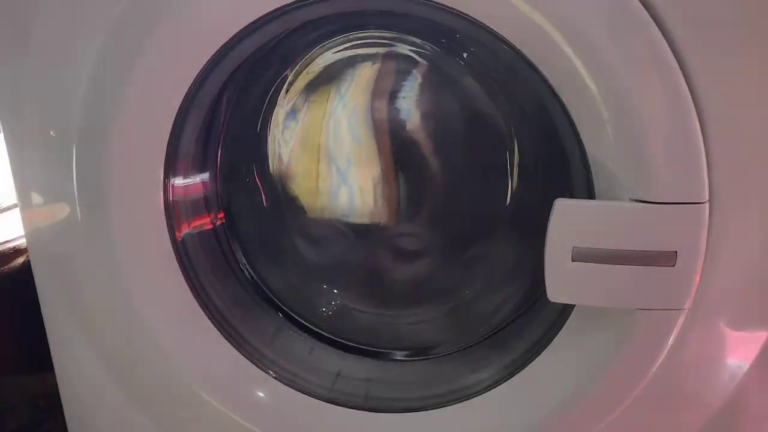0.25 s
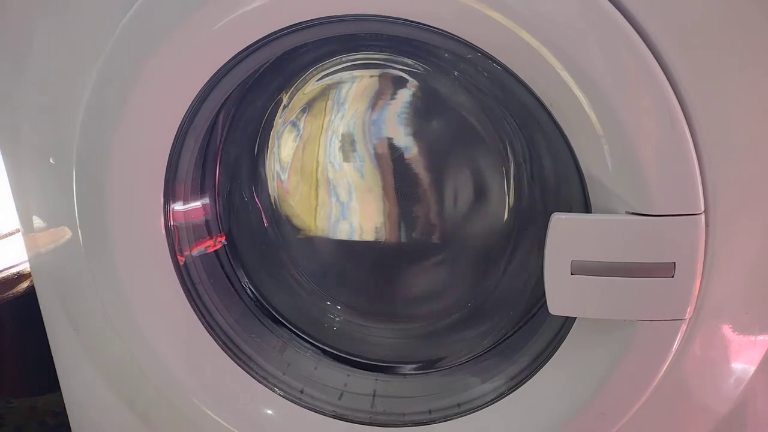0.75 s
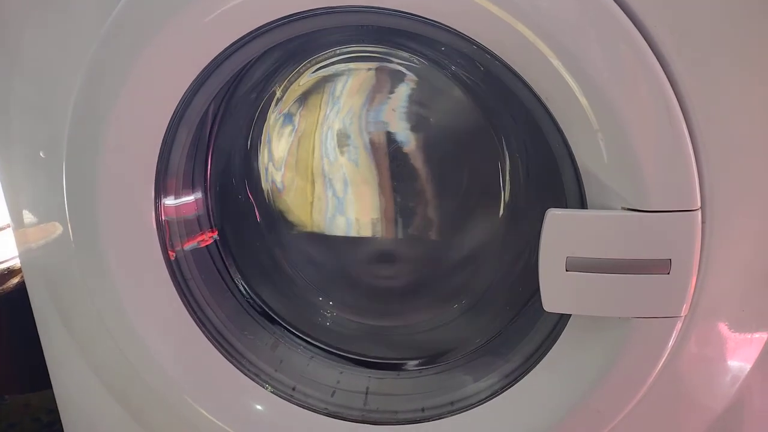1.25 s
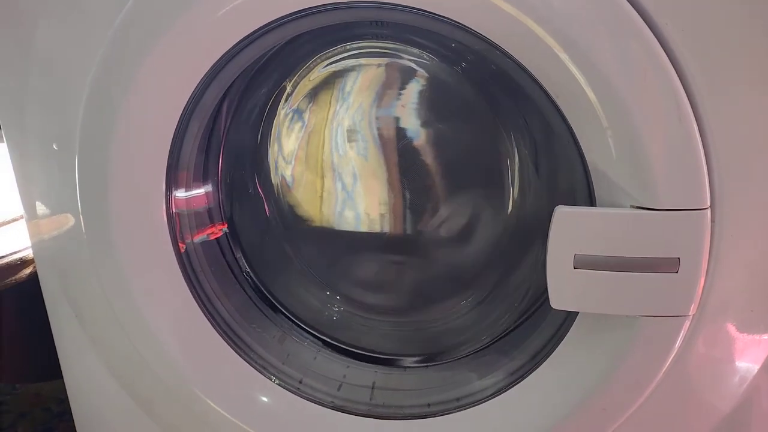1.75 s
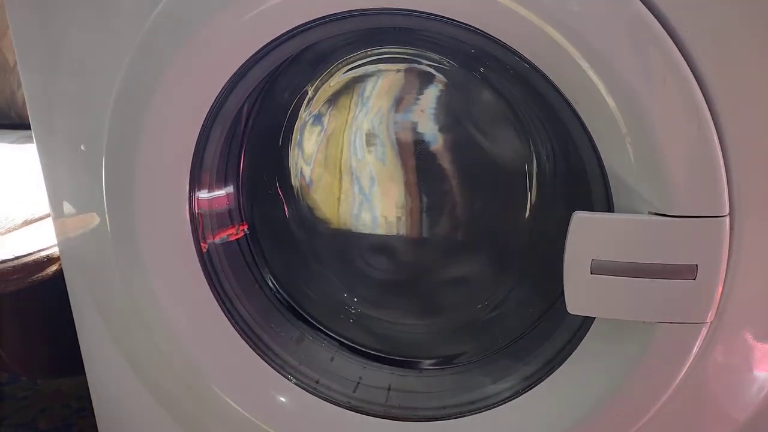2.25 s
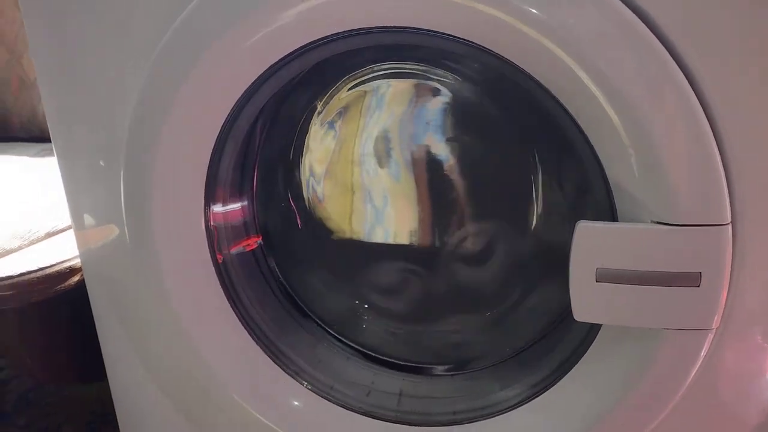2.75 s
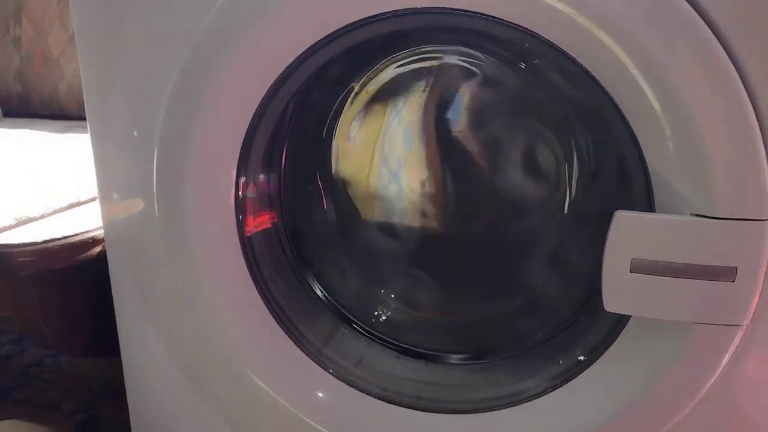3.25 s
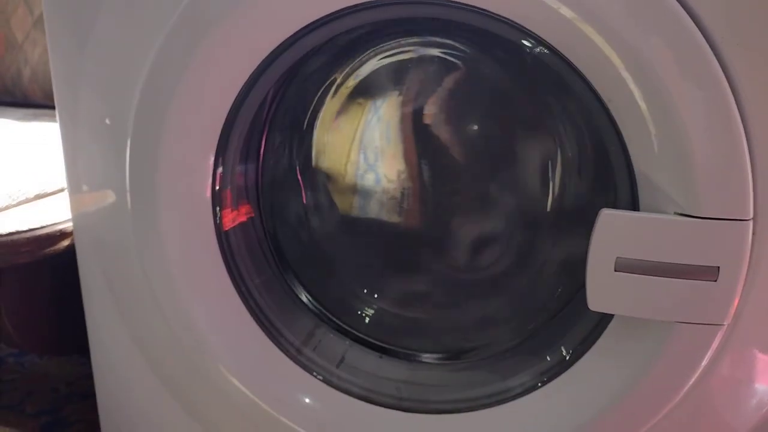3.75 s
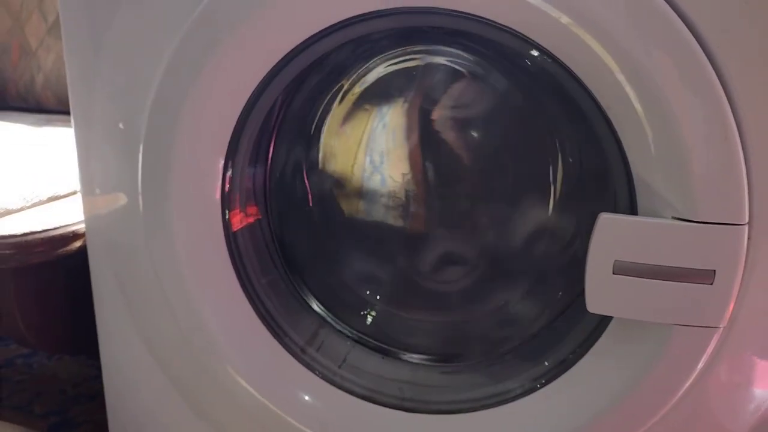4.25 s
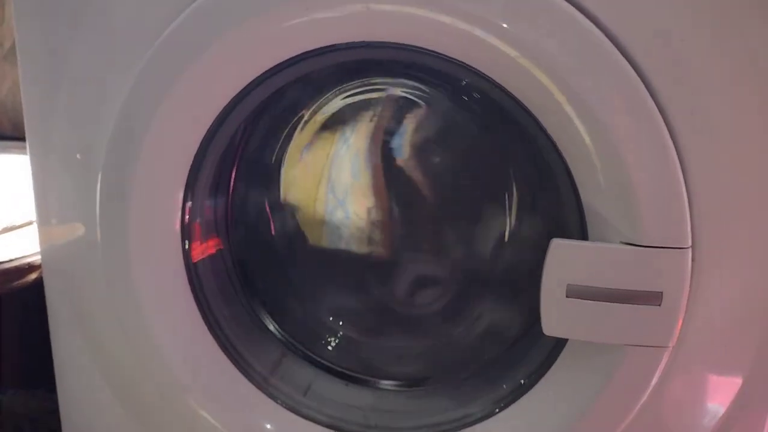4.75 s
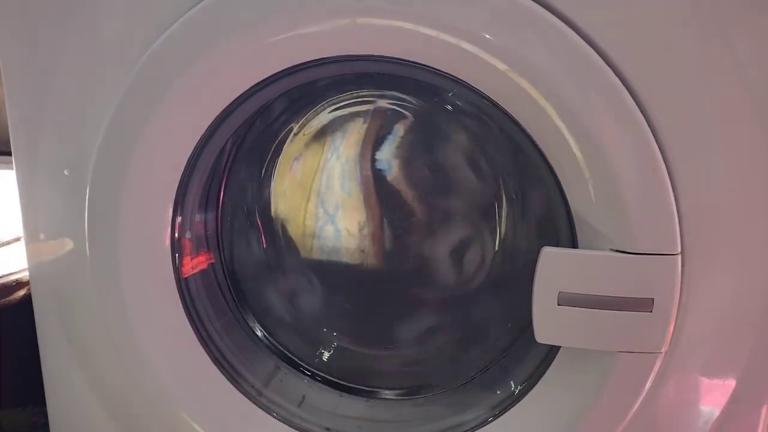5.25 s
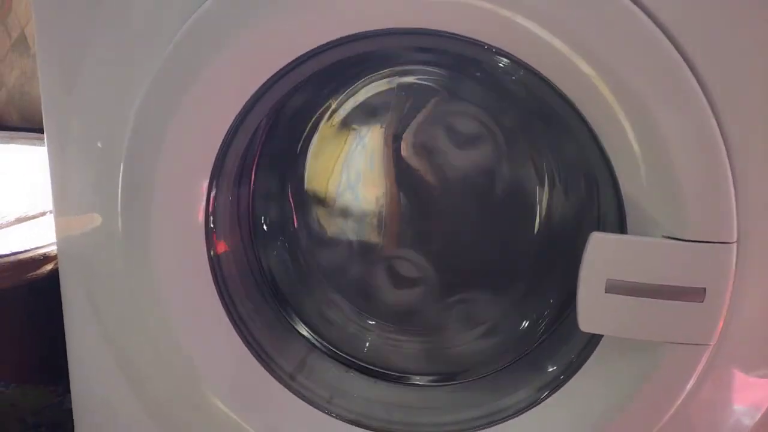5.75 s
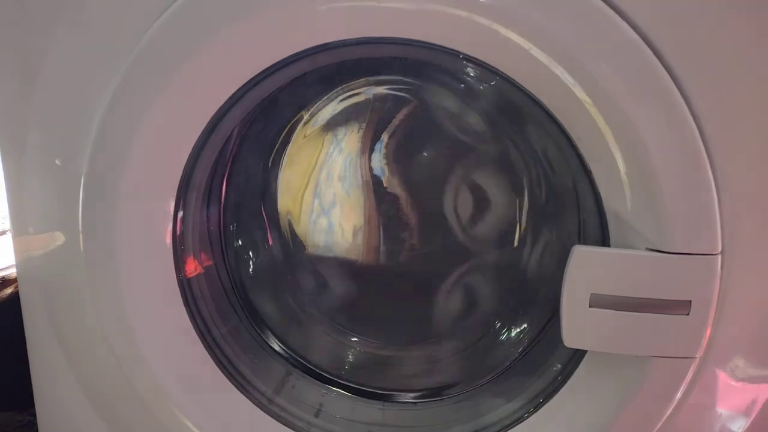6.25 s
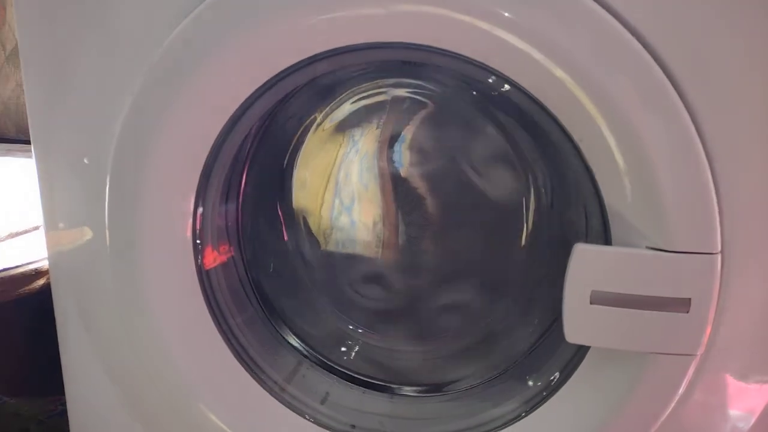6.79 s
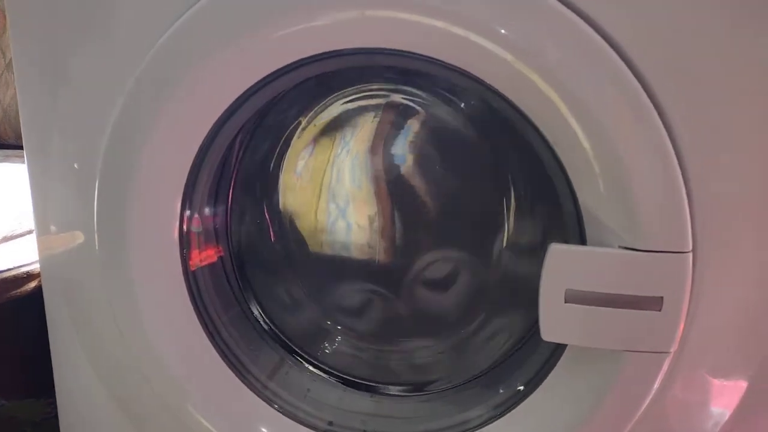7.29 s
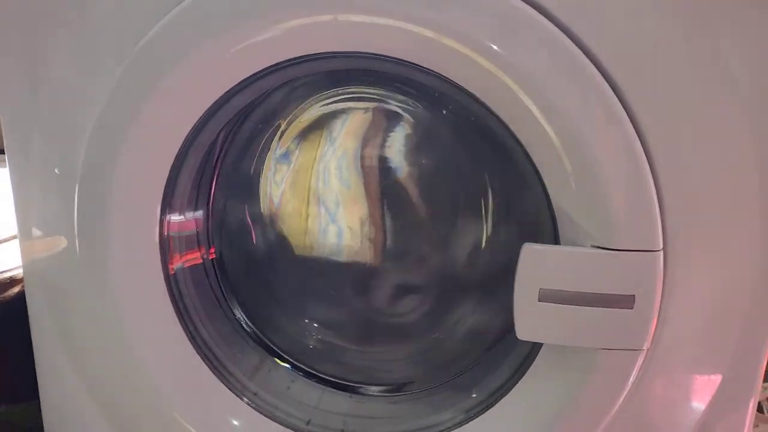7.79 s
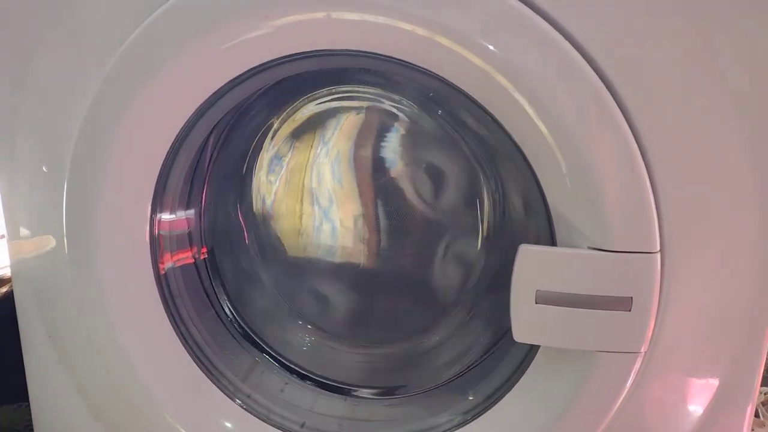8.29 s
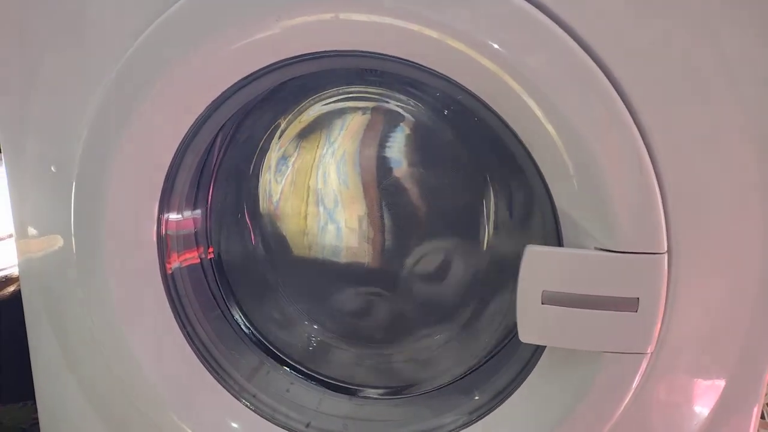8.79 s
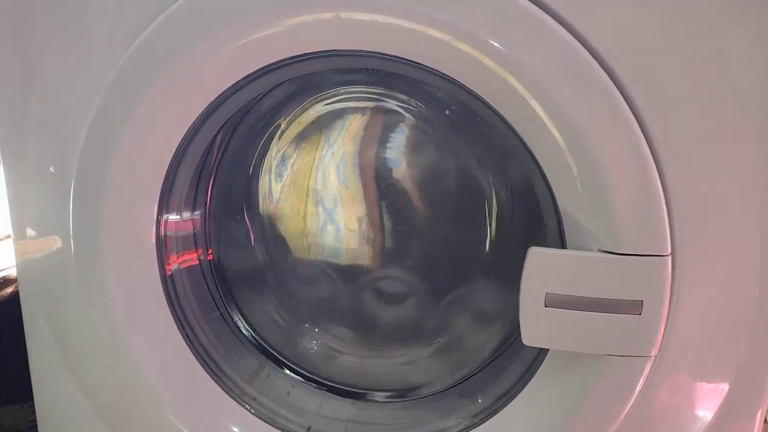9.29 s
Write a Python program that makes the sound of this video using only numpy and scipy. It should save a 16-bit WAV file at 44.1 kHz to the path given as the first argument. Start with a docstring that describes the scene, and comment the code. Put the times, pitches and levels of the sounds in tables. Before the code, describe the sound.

A front-loading washing machine is heard close up in a small, nearly dry indoor space. At 0 seconds a soft hollow churning of wet laundry pulses about six times a second; it swells to its fullest around 1.4 seconds. Mostly low-mid, boxy and watery, it dips briefly each turn, most sharply near 2.3 and 3.1 seconds. Soft wet slaps cluster between 1.8 and 3.6 seconds, with later ones near 5.6, 7.7 and 8.7. Fine spray hisses at 2.5-2.8, then over 4.7-7.2, brightest near 5.7. Short dry ticks on the door stand out at 4.7 and 7.9, with lesser ones near 7.6 and 8.5. Tiny high squeaks come at 2.4 and 4.9. The turning slows evenly to about two turns a second, and churning fades from around 6.5 without stopping by 9.5, leaving smooth hiss more exposed.

```python
"""One hears wet laundry churning round close by, a short lull once a turn, under hiss, ticks and squeaks.
A front-loading washing machine slows evenly from about six to two turns a second.
Noise and impacts of laundry and water excite the tub's hollow modes; slaps add brief bursts.
Filtered splashes make spray on the door glass, damped sines its ticks, and wavering sines wet squeaks.
"""
import sys
import numpy as np
from scipy import signal
from scipy.fft import rfft, irfft
from scipy.io import wavfile
from scipy.ndimage import uniform_filter1d

SR = 44100
rng = np.random.default_rng(int(sys.argv[2]) if len(sys.argv) > 2 else 0)


def wav_out(sig):
    """Save sig, one row per channel (or a flat mono array), as 16-bit PCM at SR to the path in sys.argv[1]."""
    wavfile.write(sys.argv[1], SR, np.round(np.clip(np.atleast_2d(sig).T, -1, 1) * 32767).astype(np.int16))


N = 420273
TIME = np.arange(N) / SR
FREQS = np.fft.rfftfreq(N, 1 / SR)

START_TURNS_PER_S, SLOWING_PER_S2 = 5.829, 0.4108
SPEED = START_TURNS_PER_S - SLOWING_PER_S2 * TIME  # turns a second


def gain_of(db):
    """Decibel law: 20 dB is a factor of ten in amplitude."""
    return 10 ** (np.asarray(db) / 20)


def evened(x):
    """Normalisation: scales a signal to rms 1."""
    return x / np.sqrt(np.mean(x ** 2) + 1e-20)


def colour(points):
    """Spectral envelope: (Hz, dB) points joined over log frequency, as an amplitude gain."""
    hz, db = np.transpose(points)
    return gain_of(np.interp(np.log(FREQS + 1), np.log(hz + 1), db))


def filtered(x, gain):
    """Linear filtering: multiplies the spectrum by a gain per frequency."""
    return irfft(rfft(x) * gain, N)


def curve(rows, column=1):
    """Linear interpolation: one column of a table joined by straight lines in time."""
    rows = np.asarray(rows)
    return np.interp(TIME, rows[:, 0], rows[:, column])


def flutter(rate_hz):
    """Low-pass noise: a slow random swing of rms 1, up to about the given rate."""
    return evened(filtered(rng.standard_normal(N), np.exp(-(FREQS / rate_hz) ** 2)))


def splashes(per_s, spread_db, share):
    """Shot noise: separate impacts of unequal size, mixed by power share with steady flow noise."""
    size = gain_of(spread_db * np.minimum(rng.exponential(1, N), 4))
    sign = rng.choice([-1., 1.], N)
    struck = rng.random(N) < per_s / SR
    impacts = evened(size * sign * struck)
    share = np.clip(share, 0, 1)
    return np.sqrt(share) * impacts + np.sqrt(1 - share) * rng.standard_normal(N)


def summed_db(levels):
    """Power addition: joint level of uncorrelated sounds."""
    power = sum(gain_of(db) ** 2 for db in levels)
    return 10 * np.log10(power + 1e-20)


def comb(spacing_hz, depth, onset_hz=2200):
    """Comb filtering: evenly spaced treble notches; a negative depth gives peaks there."""
    ramp = np.clip(2 * FREQS / onset_hz - 1, 0, 1) ** 4  # from none at half the onset to full
    depth = np.clip(depth, -.99, .99)
    return np.sqrt(1 - depth * ramp * np.cos(2 * np.pi * FREQS / spacing_hz))


# Spectrum of the background hiss. Each row: frequency in Hz, relative density in dB per Hz.
HISS_COLOUR = [(25, 4.5), (60, 4.5), (100, 8.5), (1000, 8), (3500, 4), (6000, -4.5), (8500, -3.5),
               (11000, -3.5), (16000, -5.5)]
# Course of the background hiss. Each row: time in seconds, level in dB.
HISS = [(0, -70.5), (.6, -70.5), (1.3, -66), (5, -66), (9.53, -65.5)]


def hiss():
    """Broadband noise: a smooth hiss behind everything, shaped in spectrum and level."""
    return evened(filtered(rng.standard_normal(N), colour(HISS_COLOUR))) * gain_of(curve(HISS))


# How lopsided the load lies. Each row: time in seconds, lull depth in dB before each layer's scaling.
LOPSIDED = [(0, 2), (1.5, 2), (1.9, 4), (2.28, 11.5), (2.72, 2.5), (3.15, 8.5), (4.5, 3), (5.2, 2),
            (9.53, -1)]
FIRST_LULL_S = 0.2
LULL_S, LULL_SHARPENS_S_PER_DB = 0.038, 0.0012  # a deeper lull is shorter


def lulls(stretch, lead_s, depth, extra_db, pickup=1.3):
    """Periodic modulation in dB: once a turn the load leaves the wall, then is picked up faster."""
    turns = np.cumsum(SPEED) / SR
    turns = turns - np.interp(FIRST_LULL_S, TIME, turns)
    deep_db = curve(LOPSIDED)
    length = stretch * np.maximum(LULL_S - LULL_SHARPENS_S_PER_DB * deep_db, .01)
    since_lull_s = (turns - np.round(turns)) / SPEED + lead_s
    u = since_lull_s / length
    dips = (depth * deep_db + extra_db) * np.exp(-np.where(u > 0, pickup * u, u) ** 2)
    # the local mean power over a third of a second is held level
    return -dips - 10 * np.log10(uniform_filter1d(10 ** (-dips / 10), size=SR // 3))


# Drive of the tub's bass, low and middle modes before trims. Each row: time in seconds,
# rumble level in dB, churning level in dB, sloshing level in dB.
LOAD = [(0.0, -48.5, -32.5, -37), (0.7, -40.0, -28, -31.0), (1.35, -33.5, -21.5, -23.5),
        (2.3, -37, -22.0, -27.5), (2.95, -35, -22, -29), (3.8, -35, -22, -31), (4.9, -33.0, -22, -30.5),
        (5.4, -36.5, -24.0, -32.5), (5.9, -37.0, -22.5, -32.5), (6.45, -38.5, -23.5, -34),
        (7.05, -33.5, -25.5, -36.0), (7.7, -36.0, -28, -39), (8.35, -40, -29, -39), (8.85, -36.5, -29, -41),
        (9.53, -38, -31, -42.0)]
# Thin wash of the tub's highest modes. Each row: time in seconds, level in dB.
WASH = [(0, -58), (.6, -58.8), (1.4, -49.7), (3.1, -52.8), (4.3, -57.6), (5.8, -52), (7, -54.7),
        (9.53, -60.6)]
RUMBLE_TRIM_DB, CHURN_TRIM_DB, SLOSH_TRIM_DB = 0.28, 0.01, -0.46
SWISH_DB, SWISH_DB_PER_TURN = -15, 0.8  # against untrimmed sloshing; gain per turn a second lost


def drive_levels():
    """Excitation levels in dB: rumble, churning, sloshing, swish and thin wash."""
    rumble, churning, sloshing = (curve(LOAD, column=k) for k in range(1, 4))
    swish = sloshing + SWISH_DB + SWISH_DB_PER_TURN * (START_TURNS_PER_S - SPEED)
    return [rumble + RUMBLE_TRIM_DB, churning + CHURN_TRIM_DB, sloshing + SLOSH_TRIM_DB,
            swish, curve(WASH)]


# Hollow modes of tub, drum and cabinet. Each row: frequency in Hz, width in Hz between
# the points 9 dB down, relative peak level in dB.
TUB_MODES = [(88.3, 9.5, -17), (104.6, 29, -15.5), (149.7, 30.5, -5), (214.5, 47, -9), (270.1, 56, -4.5),
             (320, 70, -4), (366.1, 77, -0.56), (400, 22, -13.5), (459.4, 22, -1), (449, 52, -7.5),
             (482.8, 45, -4.5), (538.5, 46, -4.5), (567.7, 38, -6.5), (602.3, 26, -4.5), (683.7, 74, -7.5),
             (782.3, 132, -10.5), (885, 130, -21), (1012.4, 96, -17.5), (1083, 71, -21), (1120, 260, -31),
             (1359, 167, -32), (1480, 62, -32), (1614, 200, -38), (1560, 34, -38.5), (1670, 81, -45),
             (1845, 540, -48.0)]


def tub(low, high):
    """Modal superposition: adds the powers of the resonances between two frequencies."""
    power = sum(gain_of(db) ** 2 / (1 + (2 * (FREQS - hz) / width) ** 2) ** 3
                for hz, width, db in TUB_MODES if low <= hz < high)
    return np.sqrt(power)


# Borders between the five groups of modes: a plain list of frequencies in Hz.
GROUP_EDGES_HZ = [0, 185, 520, 930, 1280, 4000]


def drum(levels_db):
    """Forced resonance: laundry and water drive the modes; all but the rumble share splashes."""
    slosh, spatter, slap = flutter(rate_hz=45), flutter(rate_hz=32), slaps()
    water = splashes(per_s=900, spread_db=2.0, share=0.39)
    drives = [rng.standard_normal(N), water, water, water, water]
    sweep = lulls(stretch=0.97, lead_s=0, depth=0.84, extra_db=0.93)
    # the rumble swings more broadly; the higher modes also flutter and slap
    swings = [lulls(stretch=1.2, lead_s=0.0033, depth=0.56, extra_db=0.5),
              0.89 * sweep + 0.85 * slosh + 0.72 * slap - .3,
              0.86 * sweep + 1.9 * slosh + 1.1 * slap - .3,
              1.6 * sweep + 1.9 * spatter + 0.33 * slap - .3,
              1.1 * sweep + 0.89 * spatter + .4 * slap - .3]
    out = np.zeros(N)
    for k, (drive, swing_db) in enumerate(zip(drives, swings)):
        modes = tub(GROUP_EDGES_HZ[k], GROUP_EDGES_HZ[k + 1])
        ring = evened(filtered(drive, modes))
        out += ring * gain_of(levels_db[k] + swing_db)
    return out


# Faint diffuse answer of the room. Each row: frequency in Hz, level in dB against the direct sound.
ROOM = [(60, -31.5), (300, -30), (700, -26.5), (1100, -21.5), (1500, -9.5), (2200, -14.5)]


def room(x, t60=.25):
    """Reverberation: an exponentially decaying noise tail (60 dB in t60), opposite left and right."""
    tail = rng.standard_normal(N) * gain_of(-60 * np.minimum(TIME / t60, 4))
    wet = filtered(x, rfft(tail / np.linalg.norm(tail)) * colour(ROOM))
    return np.array([wet, -wet])


# Gushes of water on the glass. Each row: start in seconds, end in seconds, level in dB,
# extra treble in dB, soft edge in seconds.
GUSHES = [(1.15, 1.7, -74, -1.5, 0.092), (2.53, 2.82, -59.5, -3.5, 0.019), (2.95, 3.55, -70.5, -2, 0.052),
          (4.71, 7.2, -65.2, -2.5, .06), (5.22, 6.08, -63, 3.2, .06), (5.58, 5.76, -64, 7, .02)]
MIST_DB, MIST_TREBLE_DB = -6.5, 1.5  # mist against the background hiss; its treble against its body


def spray_levels():
    """Power addition of a steady mist and gushes that swell, hold and ebb: body and treble in dB."""
    mist = curve(HISS) + MIST_DB
    body, treble = [mist], [mist + MIST_TREBLE_DB]
    for start, end, db, treble_db, edge_s in GUSHES:
        outside = np.maximum(start - TIME, TIME - end) / edge_s
        gush = db - 10 * np.log10(1 + np.exp(np.minimum(outside, 20)))
        body.append(gush)
        treble.append(gush + treble_db)
    return summed_db(body), summed_db(treble)


# Spectrum of the spray before its treble is set. Each row: frequency in Hz, relative density in dB per Hz.
SPRAY_COLOUR = [(900, -16.5), (2000, 2.5), (3300, 0.5), (6000, -4.5), (8500, -11.5), (11000, -20),
                (16000, -26)]


def spray(body_db, treble_db):
    """Shot noise of fine drops on the door glass: body and treble, split near 5 kHz, set apart."""
    drops = evened(filtered(splashes(per_s=470, spread_db=2.0, share=0.16), colour(SPRAY_COLOUR)))
    dull = filtered(drops, 1 / (1 + (FREQS / 5000) ** 8))
    bright = drops - dull
    unsteady = gain_of(1.3 * flutter(rate_hz=15))
    return (dull * gain_of(body_db) + bright * gain_of(treble_db)) * unsteady


def knock(s, hz, ring_s):
    """Damped oscillation: a sine that starts at s and decays by a factor e in ring_s."""
    t = np.clip(TIME - s, 0, 30 * ring_s)
    return -np.sin(2 * np.pi * hz * t) * np.exp(-t / ring_s)


# Ticks on the door glass. Each row: start in seconds, level in dB before the door's response,
# pitch in Hz, ring in seconds, amplitude share that bounces back.
TICKS = [(.3073, -63, 3500, .0005, .6), (.3165, -55, 3200, 0.00043, 0.64), (1.2078, -47, 6000, 0.00022, .3),
         (2.9872, -44, 3600, .0005, 0.18), (3.2157, -46.5, 2830, 0.0011, 0.18),
         (4.714, -13, 1150, 0.00056, 0.34), (4.7400, -28, 1390, 0.00032, 0.94),
         (4.7730, -50, 3400, .0003, .2), (5.0550, -38, 2400, .0004, .3), (5.9027, -36, 6500, 0.00023, 0.27),
         (6.6452, -46, 4000, 0.00027, .5), (6.7600, -45, 5500, .0003, .3),
         (7.564, -30.5, 1500, 0.00052, 0.3), (7.8665, -11.5, 1200, .0003, 0.59),
         (7.8720, -26, 1100, .0004, .1), (8.4674, -27.5, 1480, 0.00043, 0.23),
         (8.9007, -48, 2980, 0.00031, .3)]
# How the struck door radiates. Each row: frequency in Hz, gain in dB.
DOOR = [(40, -38), (250, -10.5), (600, -4), (1100, 2), (1500, -2), (2000, -3.5), (2900, 4.5), (4000, 4.5),
        (6500, -1), (12000, -6.5)]


def ticks(bounce_s=.0018):
    """Impact and radiation: buttons or zips strike the door glass and bounce once."""
    out = np.zeros(N)
    for s, db, hz, ring_s, back in TICKS:
        strike = knock(s, hz, ring_s)
        bounce = back * knock(s + bounce_s, hz, ring_s)
        out += gain_of(db) * (strike + bounce)
    return filtered(out, colour(DOOR))


# Wet folds slap the tub as they are picked up. Each row: start in seconds, extra level in dB
# before the rise, fade and each layer's scaling, fade in seconds.
SLAPS = [(.78, 4.5, 0.025), (1.784, 6, .02), (1.877, 4, 0.057), (2.298, 4, 0.035), (2.496, 8, 0.024),
         (2.705, 3.5, 0.014), (2.963, 8.5, 0.023), (3.606, 7, 0.018), (5.635, 5, 0.059), (7.681, 7, 0.033),
         (8.70, 8, 0.03)]


def slaps(rise_s=0.004):
    """Transient excitation: bursts in dB with a quick exponential rise and a Gaussian fade."""
    out = np.zeros(N)
    t = np.arange(SR // 2) / SR
    for s, db, fade_s in SLAPS:
        part = out[round(s * SR):][:len(t)]  # a view: adding to it fills out
        burst = db * (1 - np.exp(-t / rise_s)) * np.exp(-(t / fade_s) ** 2)
        part += burst[:len(part)]
    return out


# Faint squeaks of wet rubber. Each row: start in seconds, length in seconds, mean pitch in Hz,
# peak level in dB.
SQUEAKS = [(2.358, .15, 3180, -72), (4.902, .1, 3370, -66)]


def squeaks(waver_hz=20):
    """Frequency modulation: wet cloth rubs the door seal, a wavering tone that swells and fades."""
    waver = waver_hz * flutter(rate_hz=60)
    out = np.zeros(N)
    for s, length_s, hz, db in SQUEAKS:
        swell = np.sin(np.pi * np.clip((TIME - s) / length_s, 0, 1))
        tone = np.sin(2 * np.pi * np.cumsum(hz + waver) / SR)
        out += gain_of(db) * swell * tone
    return out


# Stereo balance of the machine. Each row: frequency in Hz, right over left in dB.
LEAN = [(60, 3), (300, 3.5), (700, 3.5), (1150, 2.5), (1500, -1), (1900, -6.5), (2700, 5), (4000, 1),
        (8000, 5.5), (15000, 1.5)]


def scene():
    """Superposition: sources add, balanced by level difference, and the room answers the drum."""
    turning = drum(drive_levels())
    machine = turning + spray(*spray_levels()) + hiss() + ticks() + squeaks()
    lean = colour(LEAN)
    left = filtered(machine, 2 / (1 + lean))
    right = filtered(machine, 2 * lean / (1 + lean))
    return np.array([left, right]) + room(turning)


# Spectrum of the microphone's own hiss before combing. Each row: frequency in Hz,
# relative density in dB per Hz.
OWN_HISS_COLOUR = [(60, 15.5), (400, 9.5), (1500, 5.5), (2500, 0.5), (3500, -2), (6000, -4.5),
                   (10000, -1.5), (16000, -2)]
EDGE_HZ = 15800  # upper limit of the sound


def record(dry, own_noise_db=-72):
    """Comb filtering: the microphone notches each channel differently; its opposed hiss fills them."""
    own_colour = colour(OWN_HISS_COLOUR) * comb(spacing_hz=2455, depth=-.85)
    own = evened(filtered(rng.standard_normal(N), own_colour))
    own *= gain_of(own_noise_db) * evened(gain_of(curve(HISS)))  # follows the background hiss
    left = filtered(dry[0], comb(spacing_hz=2530, depth=0.93)) + own
    right = filtered(dry[1], comb(spacing_hz=2382, depth=0.93)) - own
    edge = signal.firwin(511, EDGE_HZ, window=("kaiser", 9), fs=SR)
    ends = signal.windows.tukey(N, .002)  # short fades at both ends
    return signal.oaconvolve(np.array([left, right]) * ends, edge[None], "same")


dry = scene()
out = record(dry)
wav_out(out)
```